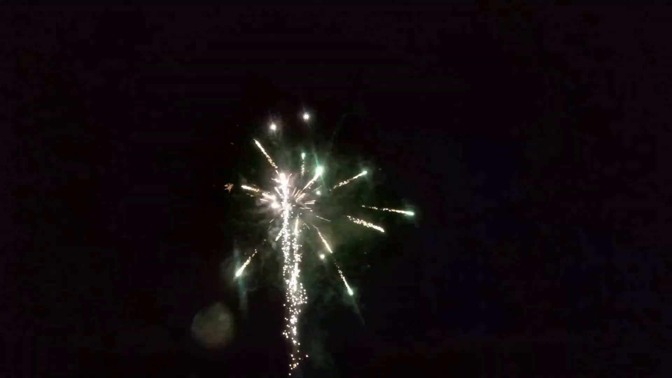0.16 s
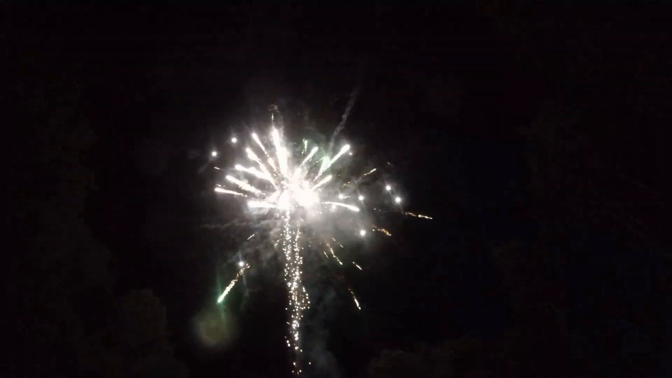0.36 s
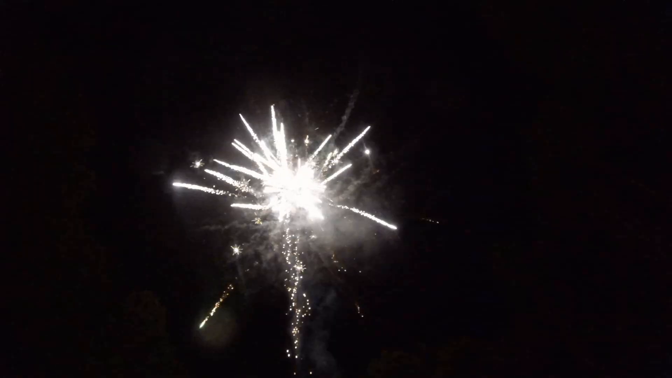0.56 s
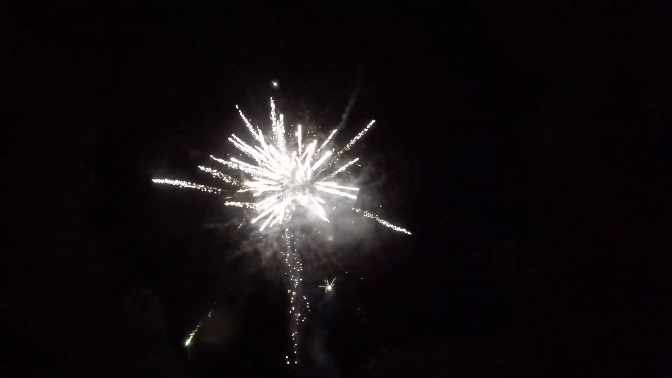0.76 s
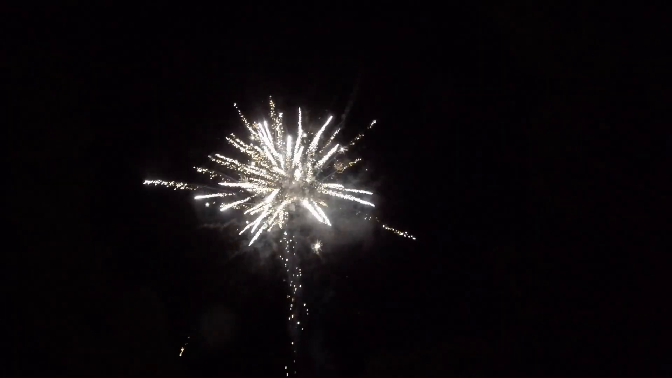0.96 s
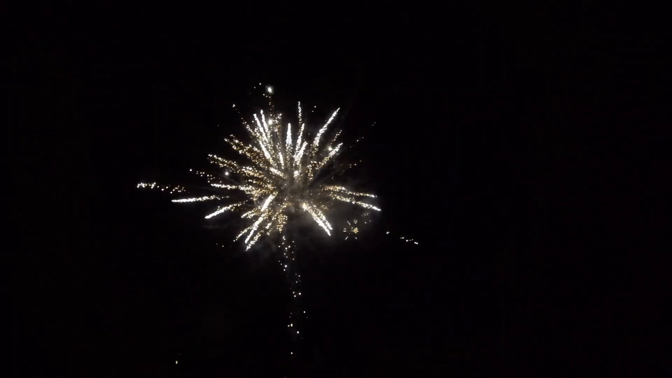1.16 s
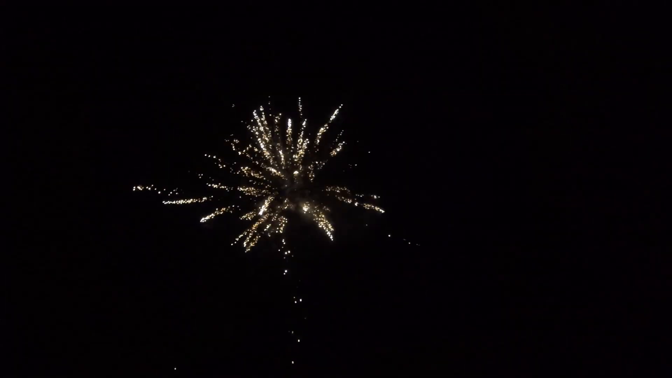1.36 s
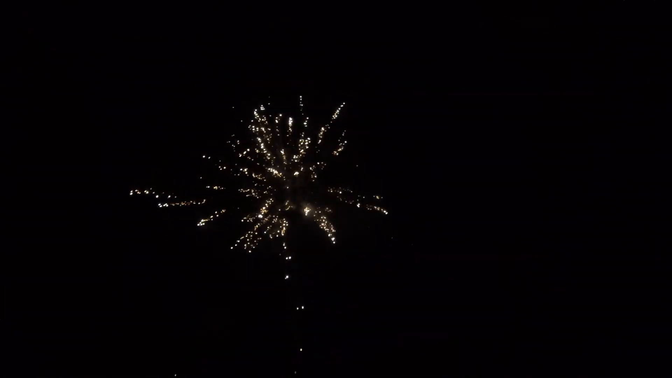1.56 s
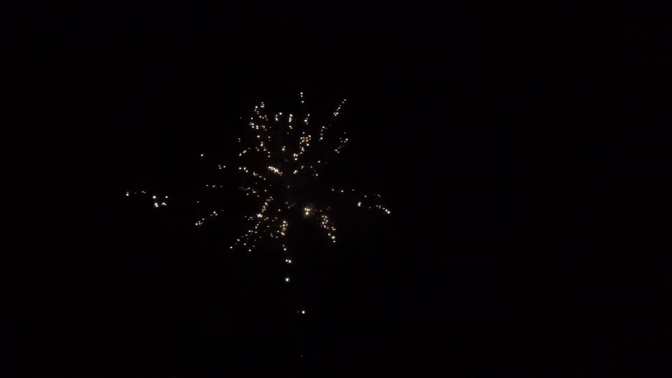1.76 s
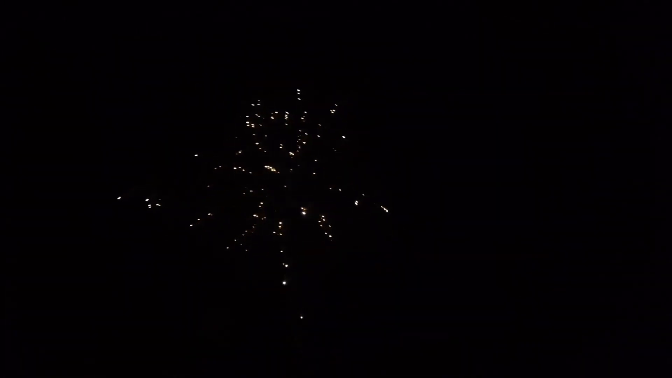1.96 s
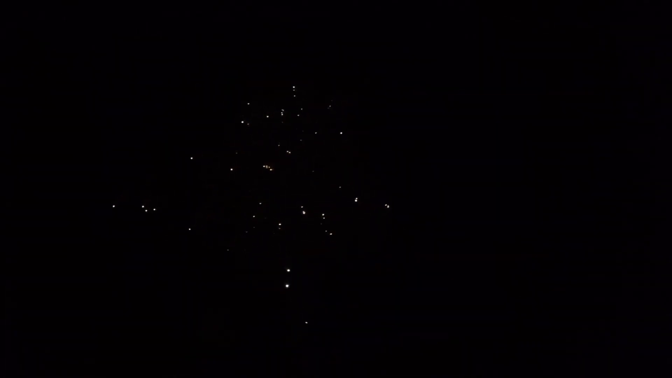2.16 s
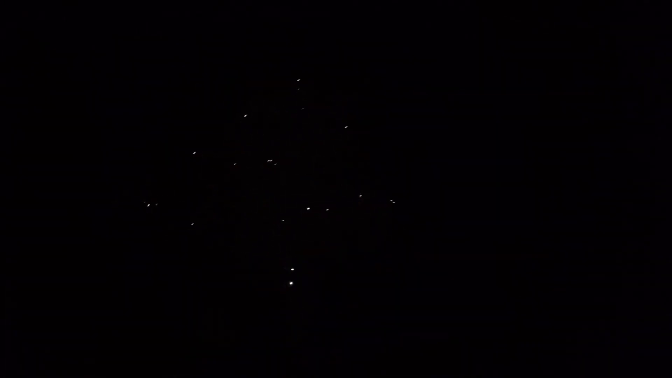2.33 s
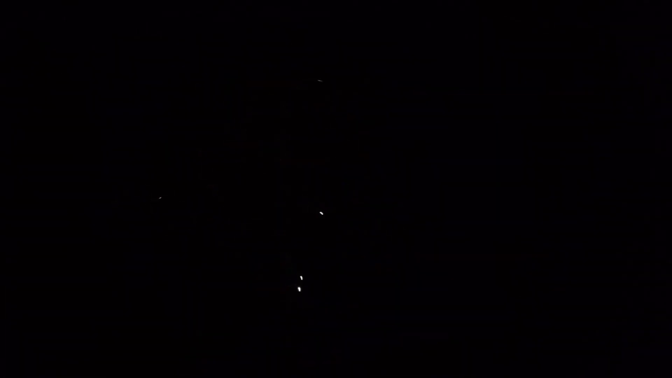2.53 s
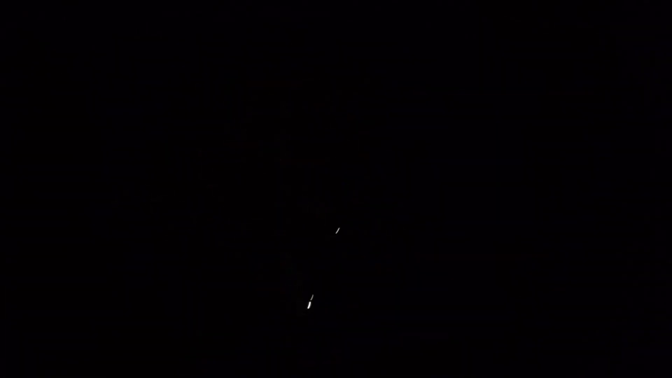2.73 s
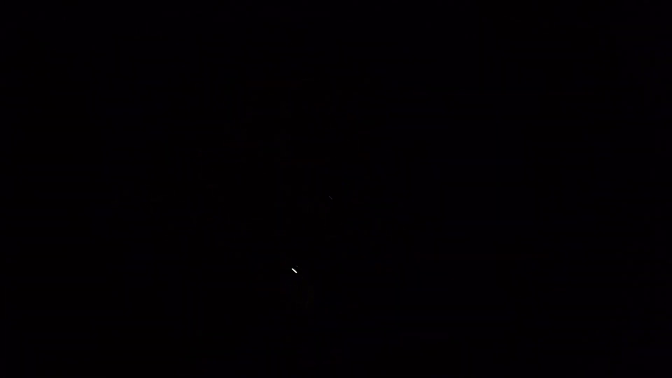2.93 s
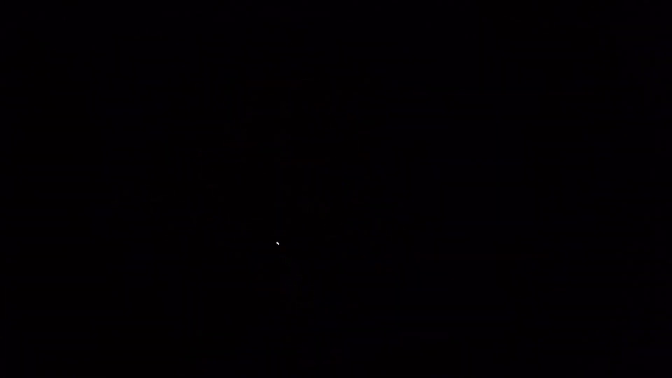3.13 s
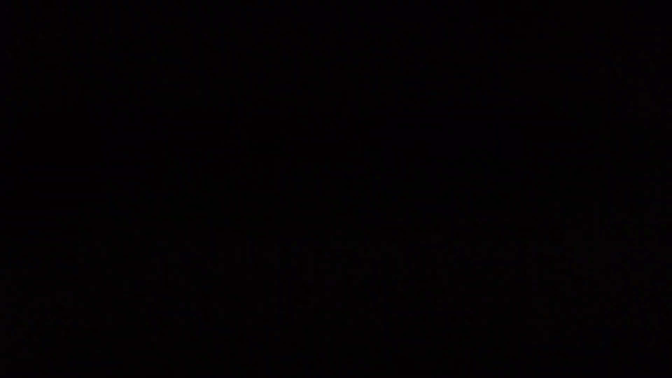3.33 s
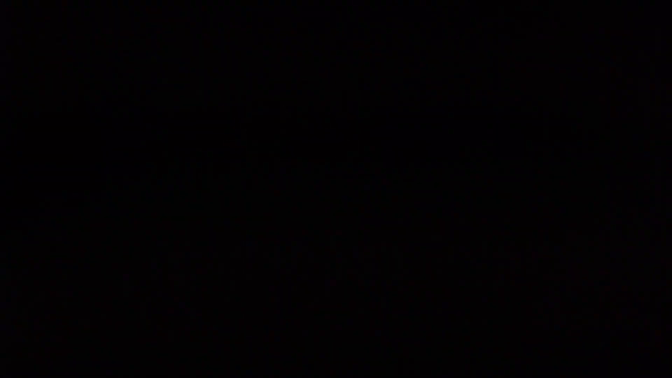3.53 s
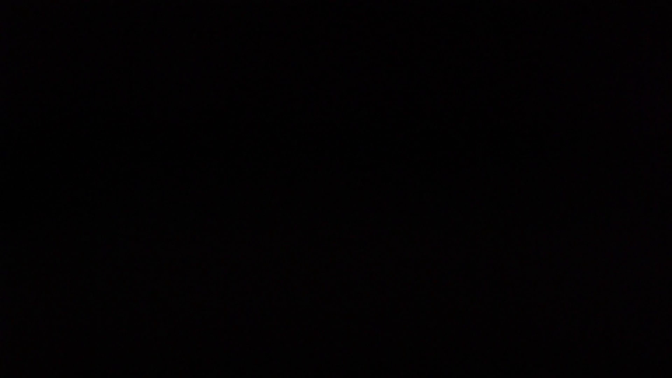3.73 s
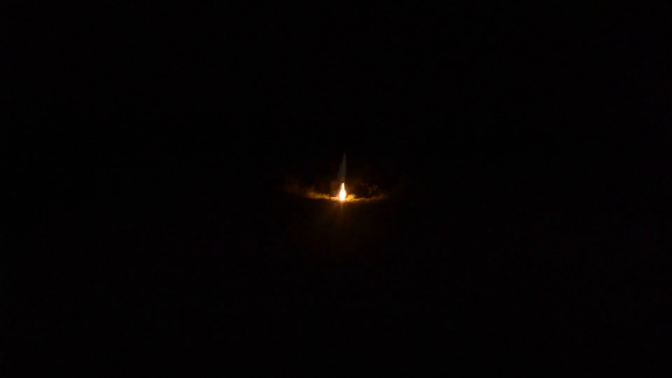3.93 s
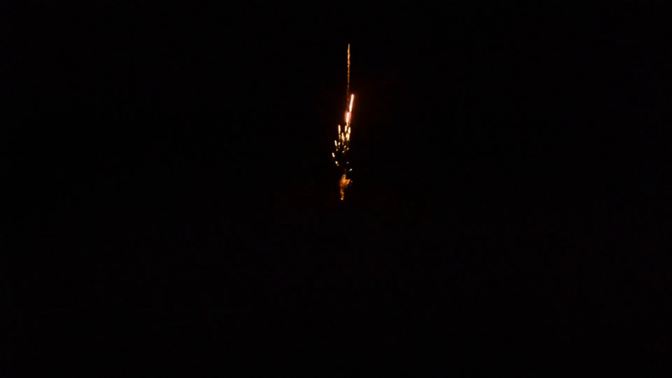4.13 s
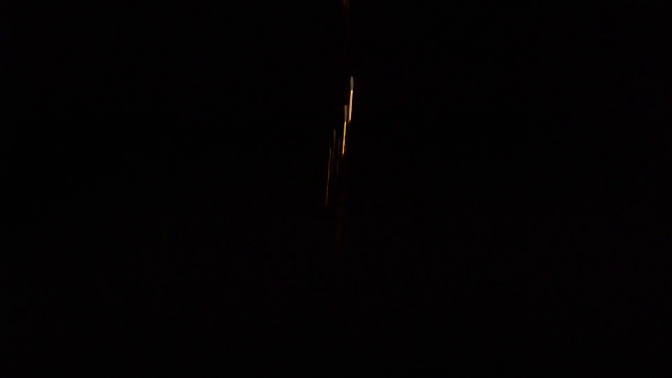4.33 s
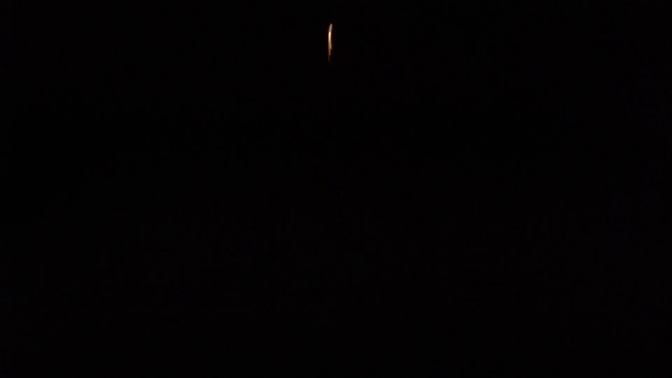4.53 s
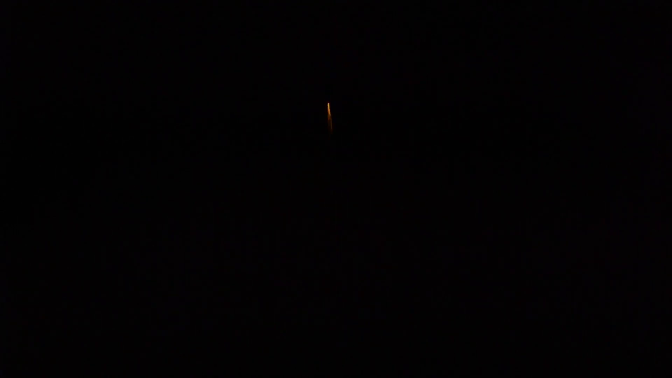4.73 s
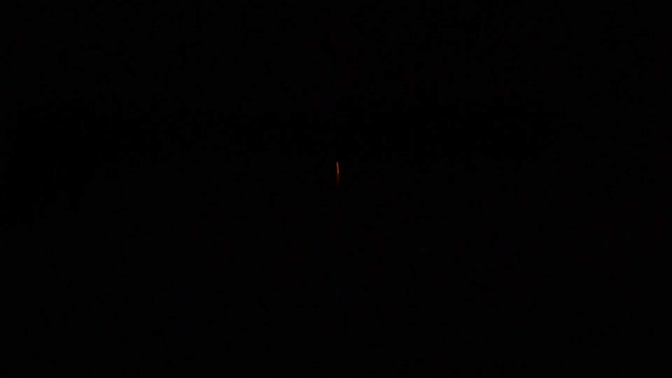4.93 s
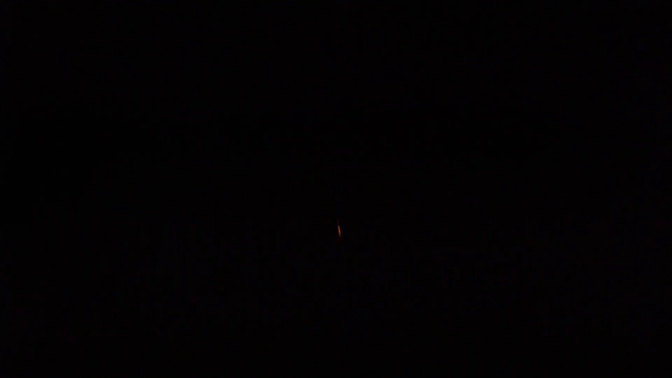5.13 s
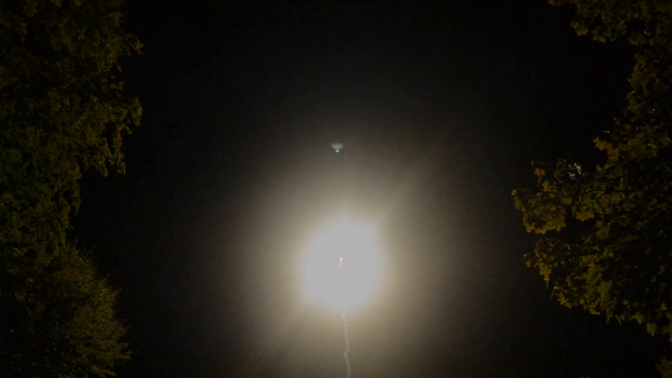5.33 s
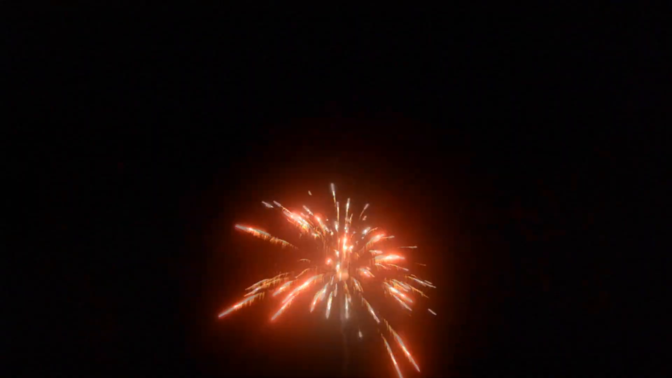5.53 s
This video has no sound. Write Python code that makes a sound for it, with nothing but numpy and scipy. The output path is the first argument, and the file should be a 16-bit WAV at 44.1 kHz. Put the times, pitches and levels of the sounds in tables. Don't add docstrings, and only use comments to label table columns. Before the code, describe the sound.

Close fireworks bang overhead in a distorted volley, stars crackle and sizzle away to quiet, then two mortar thumps with hissing echoes.

```python
import sys
import numpy as np
from scipy import signal
from scipy.fft import rfft, irfft, next_fast_len
from scipy.io import wavfile
from scipy.ndimage import uniform_filter1d

SR = 44100
rng = np.random.default_rng(int(sys.argv[2]) if len(sys.argv) > 2 else 0)


def waveform_to_disk(signal):
    frames = np.transpose(np.atleast_2d(signal))
    scaled = np.clip(frames, -1, 1) * 32767
    samples = np.round(scaled).astype(np.int16)
    wavfile.write(sys.argv[1], SR, samples)


def attenuation_scalar(level_db):
    decades = np.asarray(level_db, float) / 20
    return 10 ** decades


N = 246059
CHANGE_S = 3.287

# [t/s, level/dB, wave length/ms, ground delay/ms, ground level/dB]
SHELL_BURSTS = [
    (-.0009, 10, 0.86, 9, -5.5),
    (.3410, 8, 0.74, 9.3, -4.5),
    (0.4244, 0.5, 0.59, 9.6, -11),
    (0.5931, 3.5, 0.59, 9.4, -6.5),
    (0.755, 8, 0.81, 9.7, -8),
    (0.8961, 5.5, 0.34, 9.9, -7),
]
# [t/s, peak level/dB]
LOUD_STARS = [(.5353, -19.5), (.5451, -19.7), (.5898, -14), (.6913, -20), (.6989, -19), (.7068, -18.7),
              (.7417, -23), (.7523, -13), (1.0944, -26), (1.1153, -16.5), (1.1804, -32), (1.1892, -23.5),
              (1.233, -21), (1.2385, -17.5), (1.2798, -18.5), (1.2929, -20.5), (1.3036, -23),
              (1.3174, -21.5), (1.3209, -11), (1.3273, -22), (1.3316, -18), (1.3465, -9), (1.3995, -20.5),
              (1.4275, -14), (1.4746, -16.5), (1.4861, -15.5), (1.4976, -16), (1.5181, -22),
              (1.5229, -17.9), (1.5732, -18.5)]
# [t/s, peak level/dB, centre f/Hz, tail t60/s]
DEBRIS_TICKS = [(2.030, -48, 4200, .02), (2.097, -54, 5000, .02), (2.250, -48, 3970, 0.027),
                (2.275, -49, 4200, .03), (2.846, -44, 3370, 0.32), (3.031, -44, 3440, .12),
                (3.048, -57, 3300, 0.053), (3.18, -54, 2830, 0.036), (3.226, -61, 6000, 0.0403),
                (3.255, -53.5, 3260, 0.046), (3.372, -67.5, 5510, .04), (3.953, -64.5, 6700, 0.032),
                (3.974, -61, 6500, 0.035), (3.997, -65.5, 7470, .03)]
# [t/s, blast level/dB, tree line level/dB]
LIFT_CHARGES = [
    (4.1334, -2.5, -25.5),
    (5.2382, -3.5, -26.5),
]
# [delay/ms, level/dB]
NEAR_ECHOES = [
    (4.9, -13.5),
    (9.6, -16.5),
    (12.5, -21),
    (16.5, -23),
]

# [f/Hz, width/Hz, level/dB]
CAPSULE_MODES = [(582, 308, 8.5), (1860, 370, -10.5), (3200, 770, -18.5), (6000, 780, -35.5)]
# [f/Hz, width/Hz, level/dB]
TUBE_MODES = [(352, 198, 9.5), (1490, 550, -4.5), (3550, 660, -7), (5100, 1000, -16), (8650, 1600, -16)]
# [f/Hz, width/Hz, level/dB]
GROUND_MODES = [(523, 480, 5.5), (1880, 700, -16.5)]

# [t/s, level/dB]
ECHO_LEVEL = [(0, -28.5), (.12, -22.5), (.33, -26.5), (.44, -24.5), (1.12, -23.5), (1.42, -32.5),
              (1.85, -33.5), (2.09, -35), (2.35, -34), (2.82, -42.5), (3.07, -45.5), (3.25, -47)]
# [t/s, level/dB]
BURN_LEVEL = [(0, -37), (.15, -41.5), (.33, -50.5), (.37, -41), (.55, -38.5), (.77, -37.5), (.95, -41),
              (1.18, -44), (1.31, -38), (1.52, -42), (1.85, -58), (2.09, -60.5), (2.35, -68), (3.25, -83)]

# [f/Hz, level/dB]
ROAR_COLOUR = [(59, -51), (100, -25.5), (167, -18), (305, -3.5), (495, 0), (633, -2), (768, -9.5),
               (963, -21.5), (1300, -24), (1690, -49), (2860, -120)]
# [f/Hz, level/dB]
SIZZLE_COLOUR = [(560, -31), (950, -9.5), (1500, -4), (1930, -1), (2390, -11.5), (2770, -10), (3180, -5),
                 (3710, -10.5), (4290, -12), (5000, -29), (6500, -50.5), (11000, -120)]
# [f/Hz, level/dB]
FAR_SIZZLE_COLOUR = [(560, -35), (950, -11.5), (1280, -1), (1920, -1.5), (2450, -12), (2860, -12),
                     (3100, -10), (4750, -26.5), (5500, -33), (7150, -60), (12100, -120)]
# [f/Hz, level/dB]
SPARKLE_COLOUR = [(2650, -27), (4500, 2.5), (5320, -3.5), (6320, -1.5), (7120, -15), (7990, -11),
                  (9060, -17), (10200, -19), (14300, -36), (15700, -53.5)]
# [f/Hz, level/dB]
TREE_COLOUR = [(35, -70), (60, -35), (171, -17.5), (477, -6), (548, -5.5), (833, -5.5), (1420, -3.5),
               (2610, -7.5), (3450, -9), (7790, -18.5), (9170, -17.5), (10500, -26.5), (12100, -69),
               (13600, -40), (15700, -45.5)]
# [f/Hz, t60/s]
LEAF_DECAY = [(150, 0.5), (500, 0.99), (1500, 1.22), (4000, 0.98), (9000, 0.59), (15000, 0.61)]
# [f/Hz, level/dB]
HILL_COLOUR = [(59, -57), (100, -30), (128, -24), (242, -9.5), (426, -3.5), (633, 1), (1850, -8),
               (2190, -11), (9000, -33), (11700, -62), (19800, -120)]
# [f/Hz, level/dB]
WIND_COLOUR = [(12, -30.5), (20, -5.5), (65, 4.5), (102, 1), (160, -3), (210, -33.5), (350, -120)]
# [f/Hz, level/dB]
SELF_NOISE_COLOUR = [(2350, -29), (4000, -4.5), (4380, -4), (4870, -5.5), (6330, -5), (9290, -13),
                     (10700, -14.5), (14300, -21)]
# [f/Hz, level/dB]
NIGHT_COLOUR = [(26, -38), (45, -14), (103, -19), (129, -5.5), (174, -10.5), (380, -6.5), (512, -7.0),
                (548, -6.0), (587, -5), (1090, -6), (8590, -28.5), (10800, -32.0), (14000, -69.5),
                (22000, -120)][:-2] + [(12000, -52), (14000, -37), (15700, -45)]

NIGHT_DB, SELF_NOISE_DB = -69, -75
STAR_BODY_DB = -8
SWARM_START_S, SWARM_END_S, SWARM_DB, SWARM_SPREAD_DB = .46, 1.56, -25, 0.8
SIZZLE_DB, SIZZLE_ECHO, SIZZLE_BURN = -0.26, 0.68, 0.38
TOP_DUCK = .6
WIND_DB, PUSH_DB, PUSH_END_S = -62.5, 7.5, 0.96
LULL_S, LULL_LENGTH_S, LULL_DB = 1.6, .1, -15
LEAD_S, LEAD_DB = .003, -18
FLASH_DB, FLASH_T60_S = 7, 0.0083
BRUSH_DB, BRUSH_RISE_DB_S = -11.5, 251.5
TREES_S, TREES_DB = .0275, 1.5


def unit(x):
    return x / np.sqrt(np.mean(x ** 2) + 1e-20)


def along(points, hz):
    f, value = np.transpose(points)
    return np.interp(np.log(hz + 1), np.log(f + 1), value)


def filtered(x, response):
    m = next_fast_len(len(x) + SR // 4)
    spectrum = rfft(x, m) * response(np.fft.rfftfreq(m, 1 / SR))
    return irfft(spectrum, m)[:len(x)]


def modes(table, hz, weight=0):
    return sum(attenuation_scalar(db) * (1j * hz + weight * c) * w / (c * c - hz * hz + 1j * hz * w) for c, w, db in table)


def blast(events, body, ms, weight, rear=0, floor_hz=60):
    def wave(hz):
        jump = -modes(body, hz, weight) / (1 + 2j * np.pi * hz * ms / 1000) ** 2
        return jump * hz / (hz - 1j * floor_hz)

    lead = SR // 100
    clicks = np.zeros(N + lead)
    for s, db, length in events:
        clicks[round(s * SR) + lead] += attenuation_scalar(db)
        clicks[round((s + length / 1000) * SR) + lead] -= rear * attenuation_scalar(db)
    peak = np.abs(filtered(np.eye(1, lead)[0], wave)).max()
    return filtered(clicks, wave)[lead:] / peak


def sparks(spread_db, size=N):
    return attenuation_scalar(spread_db * rng.exponential(size=size))


def rush(colour, patchy_db, size=N, pops=1):
    z = signal.stft(rng.standard_normal(size) * pops, nperseg=256)[2]
    patches = uniform_filter1d(rng.standard_normal(z.shape), 6, 0)
    patches = unit(uniform_filter1d(patches, 5, 1))
    x = signal.istft(z * attenuation_scalar(patchy_db * patches), nperseg=256)[1][:size]
    return unit(filtered(x, lambda hz: attenuation_scalar(along(colour, hz))))


def shell_bursts():
    direct = blast([row[:3] for row in SHELL_BURSTS], CAPSULE_MODES, ms=0.036, weight=1.9, rear=0.61)
    bounces = [(s + ms / 1000, db, .95) for s, _, _, ms, db in SHELL_BURSTS]
    ground = blast(bounces, GROUND_MODES, ms=0.16, weight=1.0, rear=0.93)
    t = np.arange(N) / SR
    puff = sum(attenuation_scalar(db - 34.5 - 60 * np.maximum(t - s, 0) / .08) * (t > s) for s, db, _ in bounces)
    grit = rush(SPARKLE_COLOUR, patchy_db=3.0)
    grit = unit(filtered(grit, lambda hz: (1 + (hz / 6000) ** 2) * (hz < 14500)))
    scatter = grit + attenuation_scalar(1.0) * rush(SIZZLE_COLOUR, patchy_db=-2.0)
    scatter += attenuation_scalar(16.0) * rush(ROAR_COLOUR, patchy_db=2.0)
    return direct + ground + puff * scatter


def gain_control():
    t, db = np.arange(N) / SR, 0
    for s, blast_db, *_ in SHELL_BURSTS:
        since = np.maximum(t - s, 0)
        db = db - (6.0 + blast_db) * (1 - np.exp(-since / 0.0014)) * np.exp(-since / 0.084)
    return attenuation_scalar(db)


def star_pops(rows):
    pops = [(s, db, .2) for s, db in rows]
    for s, db in rows:
        for after, weaker in rng.uniform(size=(3, 2)):
            pops.append((s + 0.0019 * after, db - 8.0 - 9 * weaker, .2))
    snap = blast(pops, CAPSULE_MODES[1:], ms=0.014, weight=0.27, rear=0.25)
    snap = filtered(snap, lambda hz: 1 / (1 + (hz / 12000) ** 6))
    body = [(s, db + STAR_BODY_DB, 0) for s, db in rows]
    return snap + blast(body, CAPSULE_MODES[:1], ms=0.034, weight=0.39)


def star_swarm(count):
    place, size = rng.uniform(size=(count, 2)).T
    s = SWARM_START_S + (np.arange(count) + place) / count * (SWARM_END_S - SWARM_START_S)
    return list(zip(s, SWARM_DB + SWARM_SPREAD_DB * 2 * (2 * size - 1)))


def star_shower(duck):
    t = np.arange(N) / SR
    echo_db = np.interp(t, *np.transpose(ECHO_LEVEL))
    burn_db = np.interp(t, *np.transpose(BURN_LEVEL))
    sizzle_db = SIZZLE_DB + SIZZLE_ECHO * echo_db + SIZZLE_BURN * burn_db
    burnt = np.interp(t, [1.55, 2.2], [0, np.pi / 2])
    near, far = np.cos(burnt), np.sin(burnt)
    pops = sparks(spread_db=2.5)

    sizzle = near * rush(SIZZLE_COLOUR, patchy_db=1.64, pops=pops)
    sizzle += far * rush(FAR_SIZZLE_COLOUR, patchy_db=1.1)

    bright = lambda hz: (1 + (hz / 8500) ** 2) / (1 + (hz / 14700) ** 40)
    dull = lambda hz: 1 / (1 + (hz / 9000) ** 3)
    sparkle = near * filtered(rush(SPARKLE_COLOUR, patchy_db=1.2, pops=pops), bright)
    sparkle += far * filtered(rush(SPARKLE_COLOUR, patchy_db=0.0), dull)
    return duck * attenuation_scalar(sizzle_db) * sizzle + duck ** TOP_DUCK * attenuation_scalar(burn_db - 5) * sparkle


def rolling_echo():
    echo_db = np.interp(np.arange(N) / SR, *np.transpose(ECHO_LEVEL))
    return attenuation_scalar(echo_db) * rush(ROAR_COLOUR, patchy_db=0.0)


def lift_thumps():
    thumps = [(s + ms / 1000, db + change, .78)
              for s, db, _ in LIFT_CHARGES for ms, change in [(0, 3), (1.85, -9)]]
    out = blast(thumps, TUBE_MODES, ms=0.027, weight=0.32, rear=0.48, floor_hz=40.5)
    out = np.clip(out, -.57, .55)
    out = filtered(out, lambda hz: 1 / (1 + (hz / 12500) ** 10))
    echoes = [(s + ms / 1000, db + change, 0) for s, db, _ in LIFT_CHARGES for ms, change in NEAR_ECHOES]
    return out + blast(echoes, TUBE_MODES[:1], ms=0.2, weight=0.83)


def leaf_hiss(size):
    noise = rush(TREE_COLOUR, 1.16, size, sparks(spread_db=2.0, size=size))
    hz, u, z = signal.stft(noise, SR, nperseg=256)
    decay = attenuation_scalar(-60 * u / along(LEAF_DECAY, hz)[:, None])
    return signal.istft(z * decay, SR, nperseg=256)[1][:size]


def tree_line():
    size = 3 * SR // 2
    t, tails = np.arange(size) / SR - LEAD_S, np.zeros(N + size)
    flash = attenuation_scalar(FLASH_DB - 60 * t / FLASH_T60_S)
    brush = attenuation_scalar(BRUSH_DB + BRUSH_RISE_DB_S * np.minimum(t, TREES_S))
    arrived = np.clip((t - TREES_S) / 0.0032, 0, 1)
    swell = (1 - arrived) * (flash + brush) + arrived * attenuation_scalar(TREES_DB)
    swell = np.where(t < 0, attenuation_scalar(LEAD_DB), swell)
    hill_swell = attenuation_scalar(-11.5 - 60 * t / 2.49) * np.clip(t / 0.098, 0, 1)
    for s, _, trees_db in LIFT_CHARGES:
        hills = hill_swell * rush(HILL_COLOUR, patchy_db=0.0, size=size)
        answer = swell * leaf_hiss(size) + hills
        tails[round((s - LEAD_S) * SR):][:size] += attenuation_scalar(trees_db) * answer
    return tails[:N]


def debris_ticks():
    out, t = np.zeros(N + SR), np.arange(SR // 4) / SR
    for s, db, centre_hz, t60 in DEBRIS_TICKS:
        band = [(centre_hz, 0.43 * centre_hz, 0)]
        decay = attenuation_scalar(-60 * t / 0.013) + 0.41 * attenuation_scalar(-60 * t / max(t60, .005))
        tick = rng.standard_normal(len(t)) * decay
        tick = filtered(tick, lambda hz: modes(band, hz) ** 2 / (1 + (hz / 9500) ** 12))
        out[round(s * SR):][:len(t)] += attenuation_scalar(db + 0.5) * tick / np.abs(tick).max()
    return out[:N]


def wind():
    t = np.arange(N) / SR
    push_db = PUSH_DB / (1 + (t / PUSH_END_S) ** 20)
    lull_db = LULL_DB * np.exp(-((t - LULL_S) / LULL_LENGTH_S) ** 2)
    return attenuation_scalar(WIND_DB + push_db + lull_db) * rush(WIND_COLOUR, patchy_db=-1.0)


def self_noise():
    hiss = filtered(rush(SELF_NOISE_COLOUR, patchy_db=-0.5), lambda hz: hz < 14900)
    opening_db = np.interp(np.arange(N) / SR, [1.7, 2.2, 2.6], [-6, -4, 0])
    return attenuation_scalar(SELF_NOISE_DB + opening_db) * hiss


def night_field():
    return attenuation_scalar(NIGHT_DB) * rush(NIGHT_COLOUR, patchy_db=0.8) * (np.arange(N) / SR >= CHANGE_S)


def overloaded(x):
    x = x / (1 + np.abs(x / .57) ** 12) ** (1 / 12)
    padded = np.pad(x, (99, 0), "edge")
    return filtered(padded, lambda hz: 1 / (1 + 1j * hz / 9000) ** 2)[99:]


def scene():
    t = np.arange(N) / SR
    duck = gain_control()
    shells = shell_bursts() + star_pops(LOUD_STARS) + duck * star_pops(star_swarm(count=110))
    shells += star_shower(duck) + duck * (rolling_echo() + wind())
    first = overloaded(shells) + self_noise()
    first *= attenuation_scalar(-6 * np.clip((t - CHANGE_S) / 0.037 + 1, 0, 1))
    first *= np.clip((CHANGE_S - t) * SR / 60, 0, 1)
    second = lift_thumps() + tree_line() + night_field()
    return (first + second + debris_ticks())[None]


def band_limit(x):
    return signal.sosfilt(signal.butter(12, 15820, fs=SR, output="sos"), x)


def record(dry):
    return band_limit(dry)


dry = scene()
out = record(dry)
waveform_to_disk(out)
```